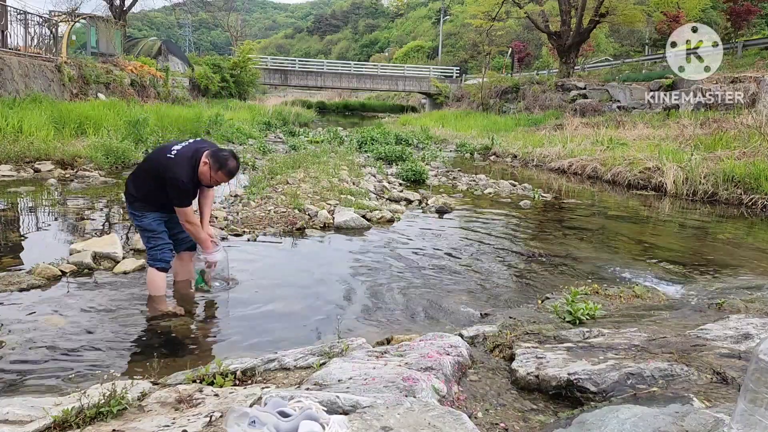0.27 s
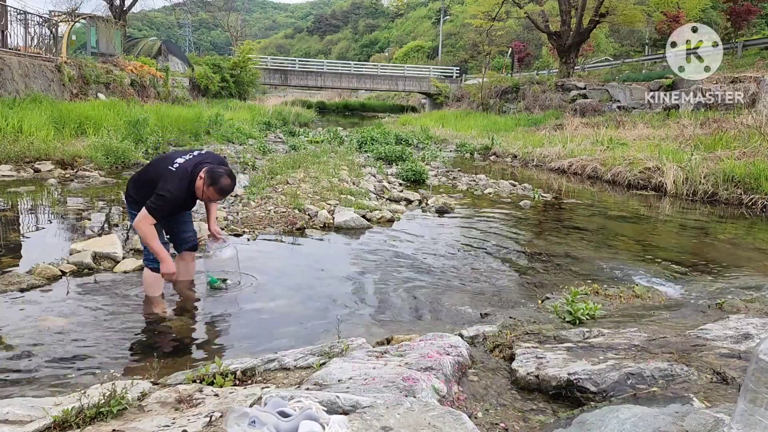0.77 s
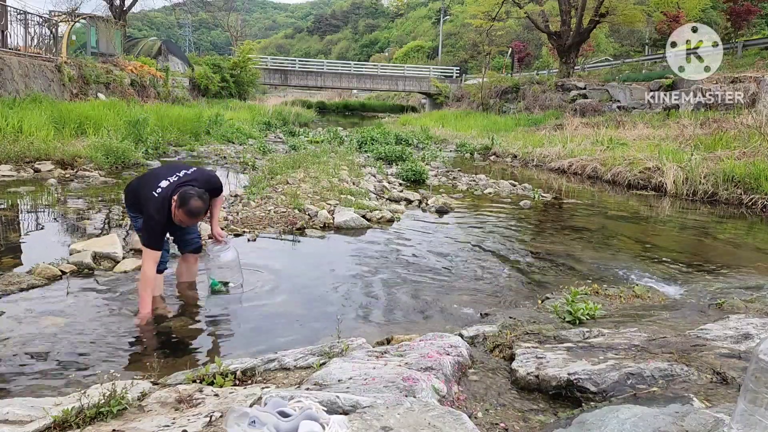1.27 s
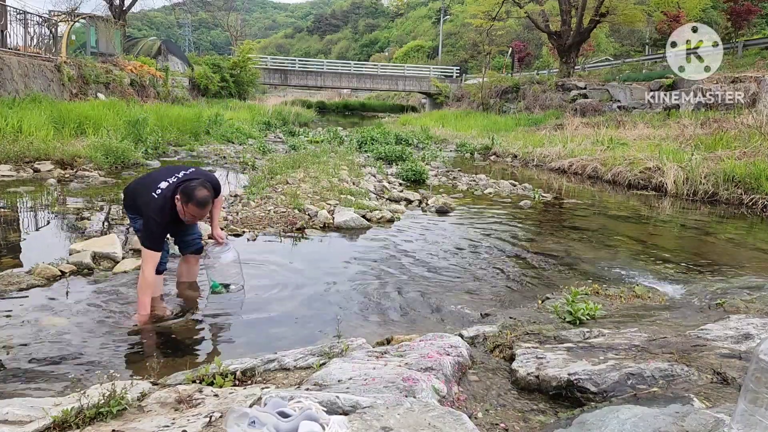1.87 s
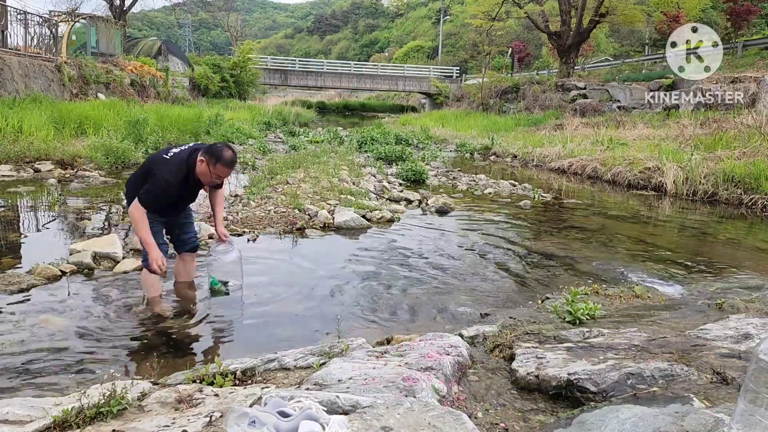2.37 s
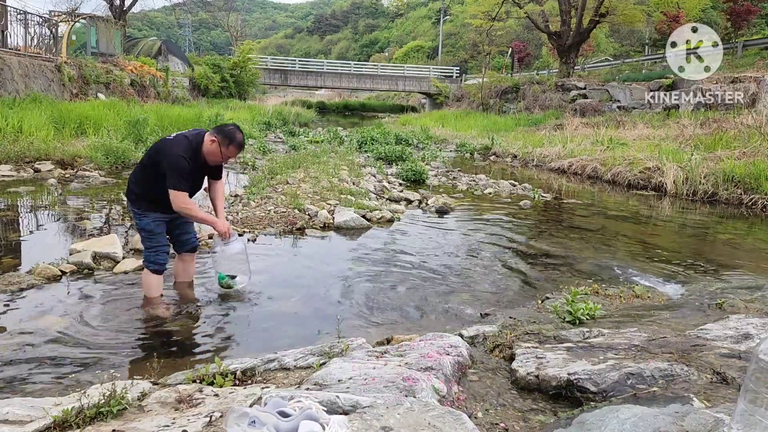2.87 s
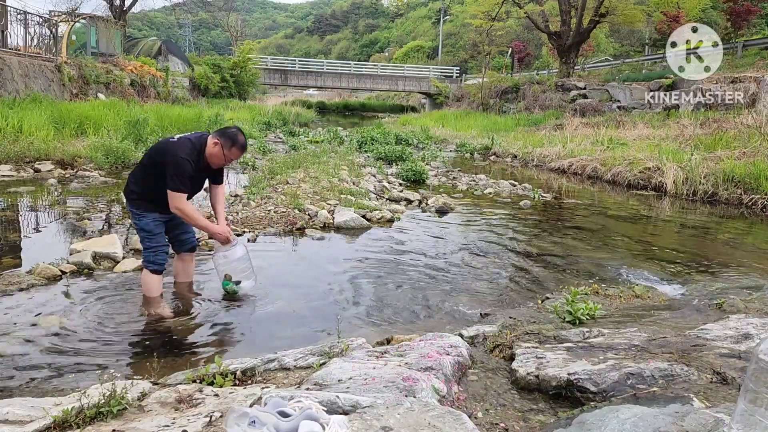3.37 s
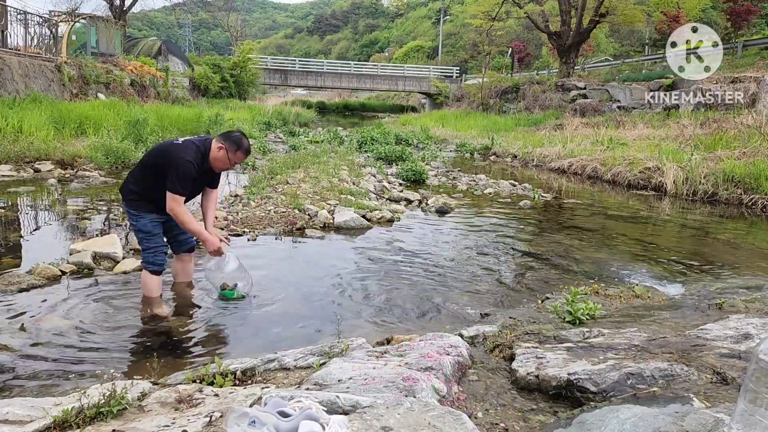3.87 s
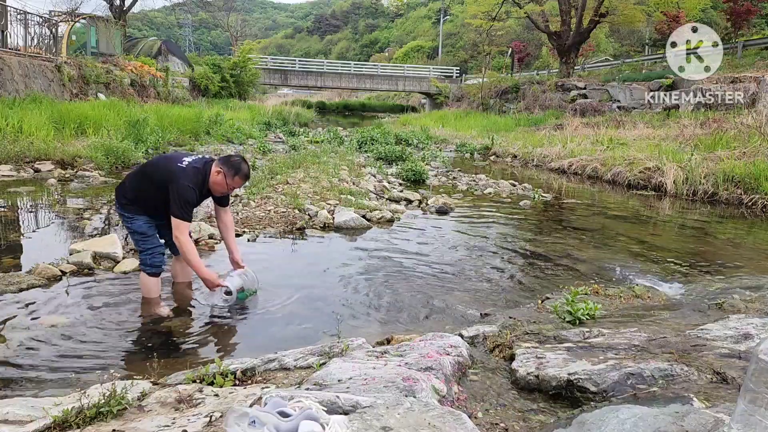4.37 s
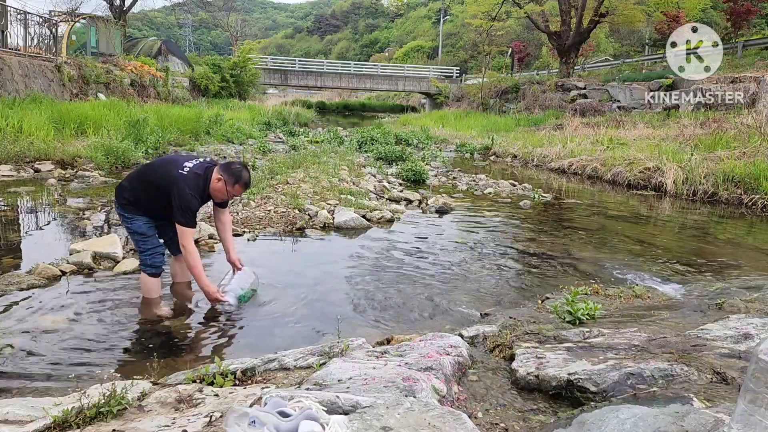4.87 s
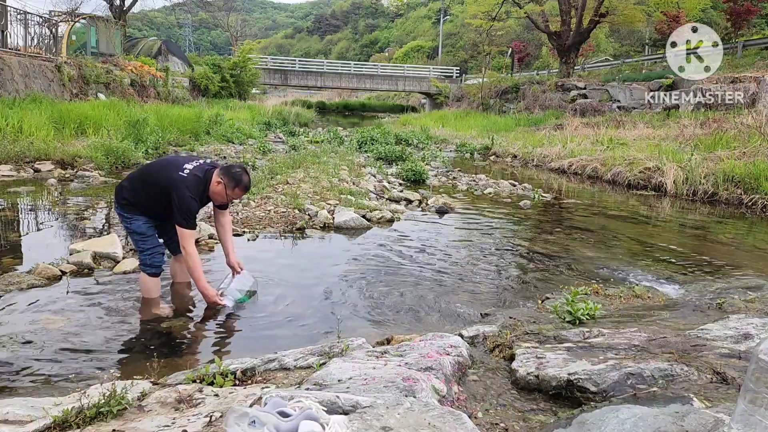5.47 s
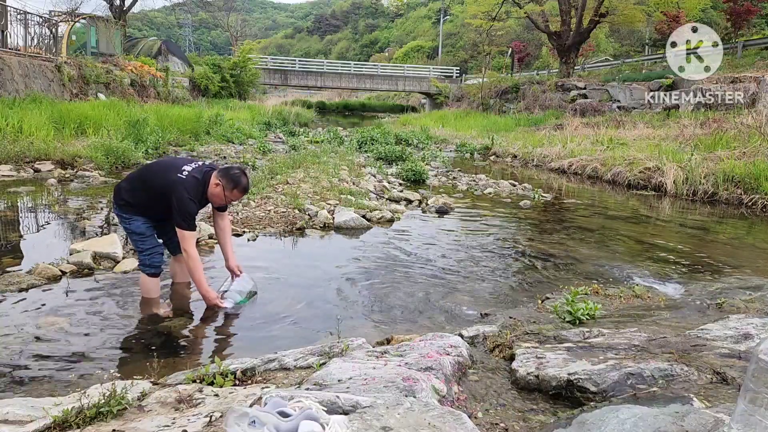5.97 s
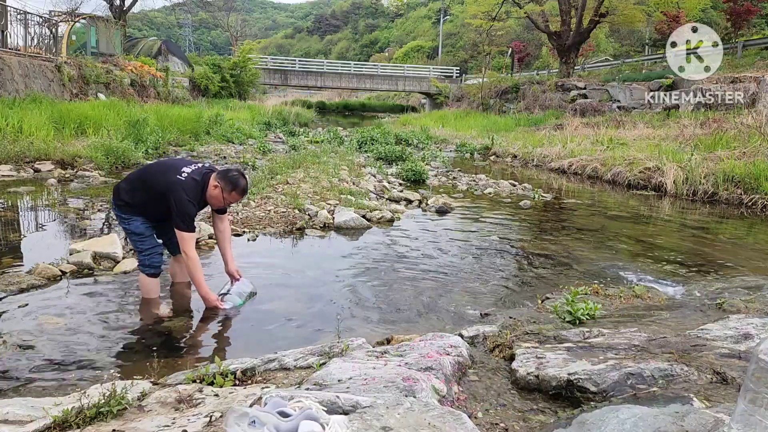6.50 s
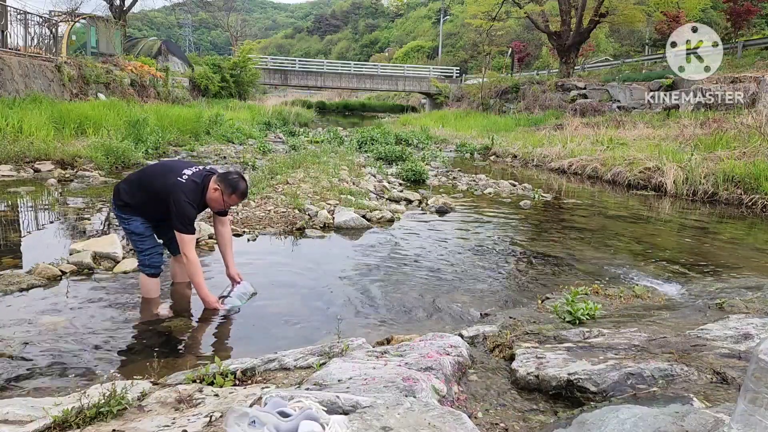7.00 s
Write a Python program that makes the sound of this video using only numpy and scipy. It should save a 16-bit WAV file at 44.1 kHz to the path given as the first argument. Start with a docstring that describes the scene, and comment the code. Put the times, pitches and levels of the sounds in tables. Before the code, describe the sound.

A shallow stream runs over stones for about seven seconds, outdoors and close, heard in stereo with the brighter, stronger side to the left. Its steady hiss is full of small ringing bubbles and low gurgles, with clearer plops standing out near 2.0, 2.9 and 5.5 seconds. At 0.3 a rapid cluster of hard, hollow knocks hits the microphone stand, buzzing briefly over a low loose thrum, and thins into light taps by 0.7. Soft rubbing continues, with a dull bump at 1.7. At 3.3 a second sharp blow is followed by smaller rattling taps until 3.6, then another little flurry from 3.75 to 3.9. Rubbing and scraping swell around 4.5 to 5.0 with two soft low thumps, then fade. The water carries on alone to the end, above a very faint, wavering distant engine drone.

```python
"""Stream and knocked stand

A shallow stream babbles over stones, mostly to the left of two microphones on a light stand: noise and ringing bubbles.
Two bouts of blows on the stand are decaying frame modes, the thrum of a loose joint and buzzing noise bands.
A hand rubs the stand by random slips through the modes; a distant engine drones in harmonics of its firing rate."""
import sys
import numpy as np
from scipy import signal
from scipy.fft import rfft, irfft, next_fast_len
from scipy.io import wavfile
from scipy.ndimage import uniform_filter1d

SR = 44100
rng = np.random.default_rng(int(sys.argv[2]) if len(sys.argv) > 2 else 0)


def transcribe(signal):
    """Save signal, clipped to [-1, 1], as a 16-bit WAV file at the path in sys.argv[1]."""
    frames = np.atleast_2d(signal).T
    limited = np.clip(frames, -1, 1)
    pcm = np.round(limited * 32767).astype(np.int16)
    wavfile.write(sys.argv[1], SR, pcm)


N = 319284
MOVED_S = 2.5  # later blows use the second place's modes; later scrapes only change level


def amp(db):
    """Level law: 20 dB is a tenfold gain."""
    return 10 ** (np.asarray(db) / 20)


def evened(x):
    """Mean-power normalisation: scales to rms 1."""
    return x / np.sqrt(np.mean(x ** 2) + 1e-20)


def read(points, hz):
    """Logarithmic pitch: interpolates a spectrum table on a log-frequency axis."""
    f, value = np.transpose(points)
    return np.interp(np.log(hz + 1), np.log(f + 1), value)


def along(table):
    """Linear interpolation in time: reads each column of a curve table at every sample."""
    s, *columns = np.transpose(table)
    return [np.interp(np.arange(N) / SR, s, c) for c in columns]


def wander(highest_hz):
    """Random-phase superposition: slow sines up to a highest rate make a drift of rms 1."""
    t = np.arange(0, N + 256, 256) / SR
    rates_hz = np.geomspace(highest_hz / 20, highest_hz, num=24)
    slow = sum(np.sin(2 * np.pi * (f * t + rng.random())) / np.sqrt(f) for f in rates_hz)
    return np.interp(np.arange(N) / SR, t, evened(slow))


def shaped(x, colour, lag=0):
    """Linear filtering: a gain table colours the spectrum, a linear phase delays it by lag samples."""
    size = next_fast_len(N + 4096)
    hz = np.fft.rfftfreq(size, 1 / SR)
    response = amp(read(colour, hz)) * np.exp(-2j * np.pi * hz * lag / SR)
    return irfft(rfft(x, size) * response, size)[..., :N]


def spikes(chance, scale_db, shape=N):
    """Poisson-like events: random instants with exponentially distributed, capped levels."""
    heights = amp(scale_db * np.minimum(rng.exponential(1, shape), 4))
    return heights * (rng.random(shape) < chance)


def bubble(hz, cycles, glide):
    """Resonance of a trapped air pocket: a soft start and a dying ring whose pitch climbs."""
    cycles = max(cycles, 2)
    u = np.arange(int(2 * cycles * SR / hz)) * hz / SR / cycles  # time in units of the given cycles
    ring = np.sin(2 * np.pi * cycles * u * (1 + glide * u / 2))
    return ring * np.exp(-2.6 * u) * (1 - np.exp(-u / .07))


# Relative spectrum of the water: frequency_hz, gain_db
WATER_COLOUR = [(25, -12), (45, 5), (110, 4), (220, -3), (350, -13), (620, -3.5), (1050, -5.5), (1450, 1),
                (1850, -3), (2200, -.5), (3600, -10), (6500, -15), (10200, -20.5), (15500, -24.5)]
# Coherence of the rush between the microphones, lag allowed for: frequency_hz, coherence (0-1)
COHERENCE = [(60, 1), (400, 0.27), (1000, 0.48), (2500, 0.39), (3500, 0.6), (8000, 0.5)]
LAG = 10.44  # samples by which the main riffle reaches the right microphone late
RUSH_DB = -46.5  # rms level before the slow swell


def rush():
    """Incoherent summation: countless far bubbles merge into a hiss with drifting patches and flicker."""
    frames, hz = N // 128 + 5, np.fft.rfftfreq(512, 1 / SR)
    a, b, c, d, patches, flicker = rng.standard_normal((6, len(hz), frames))
    patches = evened(uniform_filter1d(uniform_filter1d(patches, size=8, axis=0), size=14, axis=1))
    flicker = evened(uniform_filter1d(uniform_filter1d(flicker, size=90, axis=0), size=3, axis=1))
    alike = np.clip(read(COHERENCE, hz), 0, 1)[:, None]
    lag = LAG * np.clip(hz / 600, 0, 1)  # the bass comes from afar, in step
    late = np.exp(-2j * np.pi * hz * lag / SR)[:, None]
    left = a + 1j * b
    right = alike * late * left + np.sqrt(1 - alike ** 2) * (c + 1j * d)
    spectra = np.array([left, right]) * amp(1.58 * patches + 0.13 * flicker)
    hiss = signal.istft(spectra, nperseg=512, noverlap=384)[1][:, :N]
    swell = amp(.4 * wander(4))
    return amp(RUSH_DB) * swell * evened(shaped(hiss, WATER_COLOUR))


# Riffles where bubbles burst: right_lag_samples, relative_level_db
RIFFLE_PLACES = [(11, 7.5), (13.5, 6), (-8, 5.5)]
BABBLE_DB = -48.5
BABBLE_PER_S = 2500  # nominal rate, before clumping and the rarity of large bubbles


def babble():
    """Bubble resonance by size: near bubbles burst at random, a few loud, each size in one riffle."""
    count = 42
    spots = np.zeros((len(RIFFLE_PLACES), N))
    # a plunge makes several at once
    clumps = amp(4.5 * evened(uniform_filter1d(rng.standard_normal(N), size=900)))
    for k, hz in enumerate(np.geomspace(480, 14000, num=count)):
        cycles = rng.uniform(6, 13) * (hz / 600) ** .25
        glide = rng.uniform(.04, .3)
        spread_db = 4.6 - 0.33 * np.log2(hz / 500)  # small bubbles are more alike
        often = np.sqrt(hz / 3000)  # large bubbles are rarer
        bursts = spikes(clumps * often * BABBLE_PER_S / count / SR, spread_db)
        ringing = signal.oaconvolve(bursts, bubble(hz, cycles, glide))[:N]
        spots[k % len(RIFFLE_PLACES)] += hz / np.sqrt(often) * ringing
    pairs = sum(amp(db) * np.array([shaped(x, WATER_COLOUR), shaped(x, WATER_COLOUR, lag)])
                for x, (lag, db) in zip(spots, RIFFLE_PLACES))
    return amp(BABBLE_DB) * evened(pairs)


# Clearest single bubbles: start_s, peak_db, starting pitch_hz, decay_cycles (to fall by 2.6 nepers)
CLEAR_BUBBLES = [(0.277, -28.5, 2930, 6.2), (0.856, -35.5, 4360, 8), (0.962, -34, 7060, 10),
                 (0.98, -35, 10980, 14), (1.162, -32, 1776, 24), (1.19, -40, 604, 9),
                 (1.354, -31, 1300, 17), (1.375, -36, 590, 6.5), (1.67, -31, 1480, 12),
                 (1.749, -34.5, 765, 8), (1.941, -31, 2145, 10.4), (2.043, -23, 2130, 6.3),
                 (2.501, -28, 2450, 8.4), (2.862, -23, 2010, 21), (2.886, -31, 2530, 12),
                 (2.936, -39.5, 920, 14), (4.43, -38, 754, 7.3), (4.435, -29, 6400, 4.2),
                 (4.485, -31, 1563, 11.6), (4.67, -35, 7870, 9), (4.726, -37, 771, 17),
                 (5.512, -25, 2400, 6.3), (5.592, -23.5, 2130, 3.5), (5.672, -35.5, 4440, 8.7),
                 (5.791, -38.5, 8600, 7.6), (6.429, -37.5, 575, 6.7), (6.515, -35.5, 5640, 6.4),
                 (6.741, -33, 4120, 13.6), (6.957, -27, 2340, 10.4)]


def plops():
    """Isolated bubble resonance: the clearest bubbles burst in the main riffle."""
    out = np.zeros(N + SR)
    for s, db, hz, cycles in CLEAR_BUBBLES:
        ring = bubble(hz, cycles, 0.026)
        out[round(s * SR):][:len(ring)] += amp(db) * ring / ring.max()
    return np.array([out, np.roll(out, round(LAG))])[:, :N]


GURGLE_DB, GURGLE_PER_S = -57, 70


def gurgle():
    """Low bubble resonance: one hollow between stones gulps large bubbles."""
    out = np.zeros(N)
    for hz in np.geomspace(500, 760, num=10):
        gulps = spikes(GURGLE_PER_S / 10 / SR, 3.55)
        out += signal.oaconvolve(gulps, bubble(hz, rng.uniform(7, 13), rng.uniform(.05, .2)))[:N]
    return amp(GURGLE_DB) * evened(np.array([out, np.roll(out, round(LAG))]))


# Modes of the stand's frame: pitch_hz, t60_s, first_place_db, second_place_db (relative levels)
FRAME_MODES = [(187, 0.037, 0, -17), (239, 0.099, -3.5, -4), (292.5, 0.046, 5, 2.5), (360.4, 0.051, -3, -2),
               (429, 0.043, -3, -7), (478, 0.042, -5.5, 0.5), (621, 0.023, 4, -24), (712, 0.052, -5.5, -5),
               (772, 0.038, 0.5, 4), (1021, 0.016, 7.5, 1), (1200, 0.048, -12, -6.5),
               (1450, 0.016, -3, -19), (1880, 0.039, -12, -6), (3500, 0.017, -3, -8)]


def frame_ring(place, contact_ms, spread_db, detune):
    """Modal excitation: a long contact dulls the frame's modes; place and grip shift them."""
    t = np.arange(4096) / SR
    where, grip = rng.standard_normal((2, len(FRAME_MODES)))
    ring = np.zeros(len(t))
    for (hz, t60, *db), w, g in zip(FRAME_MODES, where, grip):
        decay = amp(db[place] + spread_db * w - 60 * t / t60)
        ring += decay * np.sin(2 * np.pi * hz * (1 + detune * g) * t)
    push = np.sin(np.pi * np.clip(t[:400] * 1000 / max(contact_ms, .1), 0, 1)) ** 2
    ring = np.convolve(ring, push)
    return ring / abs(ring).max()


# Loose joint, a row for each place: rest_pitch_hz, pitch_drop_hz (per unit of swing), t60_s
LOOSE_JOINT = [(135.4, 71, 0.38), (143, 48, 0.24)]
# Contacts of the stand: start_s, blow_db, contact_ms, joint_swing_db (which the thrum heads for)
CONTACTS = [(.335, -9.5, 0.19, -9.5), (.353, -5.5, 0.22, -8), (.364, -15, 3.5, -9),
            (.379, -11.5, 0.75, -26), (.388, -24, 1.1, -18.5), (.424, -19.5, 1.3, -19),
            (.477, -17, 0.83, -15.5), (0.524, -26.5, 0.22, -28), (.609, -22.5, 1.2, -29),
            (.632, -27, 0.44, -28), (.655, -36, 0.81, -32.5), (3.330, -11.5, 0.64, -24),
            (3.331, -11.5, 1.02, -35), (3.336, -4, 2, -7.5), (3.374, -31, 3, -24), (3.401, -17, 0.88, -24),
            (3.415, -22, 0.81, -21), (3.43, -22.5, 2.1, -40), (3.456, -25, 2.4, -28),
            (3.483, -28, 4.1, -35), (3.56, -29, 2, -38.5), (3.607, -30, 1.3, -38), (3.764, -31, .4, -41),
            (3.777, -28, 1.7, -31.5), (3.795, -19.5, 1.7, -19.5), (3.818, -23, 2.3, -25.5),
            (3.897, -33, 2.3, -36), (3.918, -33, 1.5, -34)]
RESTART_DB = 12  # a contact that raises the swing this much starts the thrum's phase afresh


def thrum():
    """Softening spring: each contact resets the joint's swing; a wide swing lowers its pitch."""
    s, _, _, swing_db = np.transpose(CONTACTS)
    t = np.arange(N) / SR
    rest_hz, sag_hz, t60 = np.array(LOOSE_JOINT)[(t > MOVED_S).astype(int)].T
    last = np.searchsorted(s, t) - 1
    level_db = np.where(last >= 0, swing_db[last] - 60 * (t - s[last]) / t60, -200)
    swing = signal.lfilter([.014], [1, .014 - 1], amp(level_db))  # the joint takes a moment to follow
    turns = np.cumsum(rest_hz - sag_hz * uniform_filter1d(swing, size=600)) / SR
    fresh = np.diff(level_db, prepend=-200) > RESTART_DB
    turns_at_start = np.maximum.accumulate(turns * fresh)
    return swing * np.sin(2 * np.pi * (turns - turns_at_start))


def knocks():
    """Impulse response: each contact rings the frame with a short rattle over the joint's thrum."""
    out = np.zeros(N + SR)
    after = np.arange(3000) / SR
    for at, db, contact_ms, _ in CONTACTS:
        rattle = .04 * rng.standard_normal(len(after)) * amp(-60 * after / .15)
        rattle[0] = -1  # the blow itself
        ring = signal.fftconvolve(rattle, frame_ring(int(at > MOVED_S), contact_ms, 1.5, .03))
        out[round(at * SR):][:len(ring)] += amp(db) * ring
    body = out[:N] - thrum()
    # deep bass cut from the knocks
    body = signal.sosfilt(signal.butter(4, 82, "high", fs=SR, output="sos"), body)
    return np.array([body, shaped(body, [(100, 1.1), (400, 0.4), (1500, 4.5)], 6.0)])


# Bands in which a loose part buzzes: centre_hz, t60_s, first_place_db, second_place_db (re the blow)
BUZZ_BANDS = [(1600, 0.11, -25, -27), (3000, .06, -35.5, -28.5), (8450, 0.2, -41.5, -46)]
BUZZ_DB_PER_MS = -1  # a long contact shakes it less


def buzz():
    """Band-limited noise: each blow starts bursts that swell in under a millisecond and die."""
    out = np.zeros((2, N + SR))
    t = np.arange(4096) / SR
    for s, blow_db, contact_ms, _ in CONTACTS:
        for hz, t60, *db in BUZZ_BANDS:
            edges_hz = [hz * 0.84, min(hz * 1.27, 20000)]
            band = signal.butter(2, edges_hz, "band", fs=SR, output="sos")
            shared, own = rng.standard_normal(len(t)), rng.standard_normal((2, len(t)))
            noise = evened(signal.sosfilt(band, shared + 3.3 * own))
            level_db = blow_db + db[int(s > MOVED_S)] + BUZZ_DB_PER_MS * contact_ms - 60 * t / t60
            burst = noise * amp(level_db) * np.clip(t / 0.00085, 0, 1)
            out[:, round(s * SR):][:, :len(t)] += burst
    return out[:, :N]


# Soft low bumps: start_s, level_db (before rise and decay), pitch_hz
SOFT_BUMPS = [(1.74, -34, 123), (2.997, -40, 118), (4.686, -36, 119), (4.936, -33, 87.4)]
BUMP_T60_S, BUMP_RISE_S = .24, 0.0051


def bumps():
    """Decaying sine: soft low thumps that hum briefly and die away."""
    out, t = np.zeros(N + SR), np.arange(SR // 2) / SR
    for s, db, hz in SOFT_BUMPS:
        envelope = amp(db - 60 * t / BUMP_T60_S) * np.minimum(t / BUMP_RISE_S, 1)
        out[round(s * SR):][:len(t)] += envelope * np.sin(2 * np.pi * hz * t)
    return out[:N]


# Rubbing of a hand on the stand: start_s, dull_drag_db
RUB_CURVE = [(0, -52), (.75, -49), (1.8, -49.5), (2.15, -56.5), (2.75, -62.5), (3.25, -54.5), (3.7, -50),
             (4.0, -56.5), (4.4, -53.5), (4.55, -49.5), (4.7, -44.5), (4.82, -47), (4.92, -41),
             (5.01, -47.5), (5.06, -56.5), (6.7, -62), (7.24, -61.5)]
# the dry scrape follows the drag (dB per dB about a pivot); its level before and after MOVED_S
SCRAPE_SLOPE, SCRAPE_PIVOT_DB, SCRAPE_DB = 0.84, -49, (-56.5, -51.5)


def rubbing():
    """Stick-slip friction: uneven tiny slips drive the frame, soft ones its low modes, dry ones the higher."""
    drag_db, = along(RUB_CURVE)
    dry_db = np.where(np.arange(N) / SR > MOVED_S, SCRAPE_DB[1], SCRAPE_DB[0])
    catching_db = 1.4 * wander(40.)  # the hand catches and slides
    scrape_db = dry_db + SCRAPE_SLOPE * (drag_db - SCRAPE_PIVOT_DB) + catching_db
    slips = rng.standard_normal((2, N)) * spikes(1500 / SR, 2.7, (2, N))
    drag = signal.oaconvolve(slips[0], frame_ring(0, 4.04, 0, 0))[:N]
    scrape = signal.oaconvolve(slips[1], frame_ring(0, 1.23, 0, 0))[:N]
    scrape = signal.sosfilt(signal.butter(3, 560, "high", fs=SR, output="sos"), scrape)
    return amp(drag_db) * evened(drag) + amp(scrape_db) * evened(scrape)


# Distant engine, before its unsteadiness: start_s, firing_hz, first_order_db, second_order_db
ENGINE_CURVE = [(0, 52.5, -46, -48), (.19, 55.7, -55, -55.5), (.8, 58.34, -46, -48),
                (1.52, 52.54, -58, -49.5), (2.54, 51.4, -53, -64.5), (3.0, 51.3, -58, -49.5),
                (3.25, 51.1, -49.5, -60), (4.05, 55.7, -59, -54.5), (4.42, 47.5, -57, -57),
                (4.94, 45.43, -64, -59), (5.28, 57.6, -47.5, -50), (5.81, 62.3, -49, -57),
                (6.14, 62.2, -47.5, -52), (7.24, 51.14, -60.5, -62)]


def engine():
    """Harmonic series: low orders of the firing rate, unsteady after a long way through the air."""
    hz, first_db, second_db = along(ENGINE_CURVE)
    turns = np.cumsum(hz * (1 + .012 * wander(12.0))) / SR
    out = np.zeros(N)
    for k, db in [(1, first_db), (2, second_db), (3, second_db - 22), (4, second_db - 15.5)]:
        fading_db = 3 * wander(24)
        out += np.sqrt(2) * amp(db + fading_db) * np.sin(2 * np.pi * k * turns)
    return out


def scene():
    """Superposition: two-sided water, knocks and buzz; bumps, rubbing and engine alike on both sides."""
    water = rush() + babble() + plops() + gurgle()
    stand = knocks() + buzz() + bumps() + rubbing()
    return water + stand + engine()


# Colour of the shaded, dull right microphone: frequency_hz, gain_db
RIGHT_COLOUR = [(200, 0), (1000, -1), (1400, -2.5), (1900, 0), (2500, -5.5), (4400, -1), (6300, -5),
                (10500, -2.5), (11600, -13), (15500, -12)]
EDGE_HZ = 15730  # upper band limit


def record(dry):
    """Linear reception: the right microphone's colour, then the band limit on both."""
    heard = np.array([dry[0], shaped(dry[1], RIGHT_COLOUR)])
    low_pass = signal.firwin(1023, EDGE_HZ, window=("kaiser", 10), fs=SR)
    return signal.oaconvolve(heard, low_pass[None], "same")


dry = scene()
out = record(dry)
transcribe(out)
```